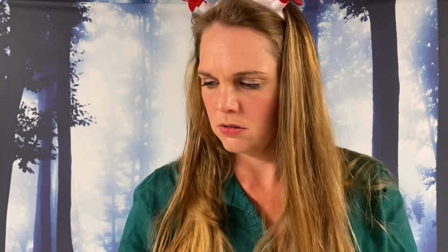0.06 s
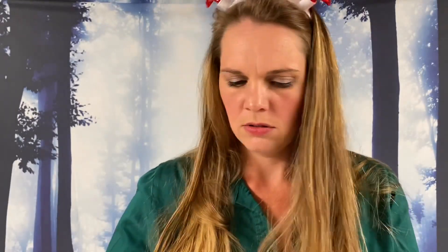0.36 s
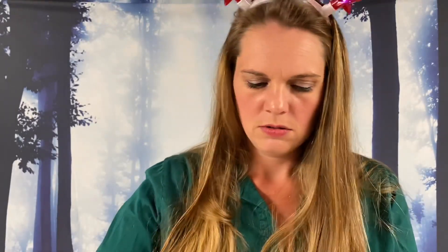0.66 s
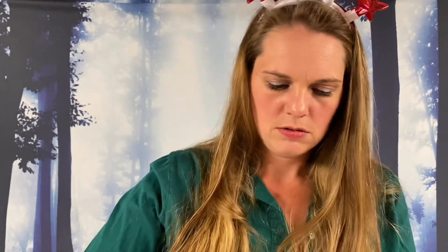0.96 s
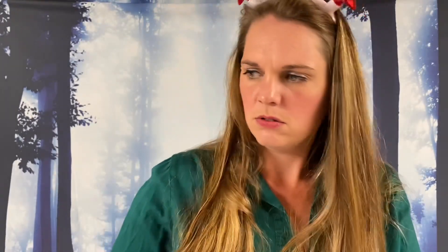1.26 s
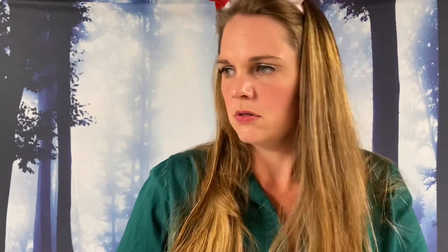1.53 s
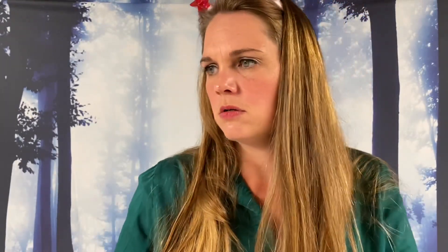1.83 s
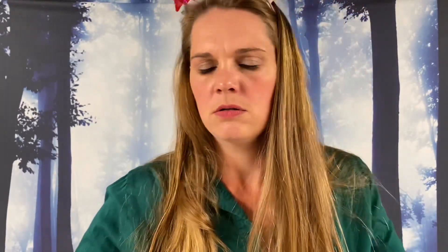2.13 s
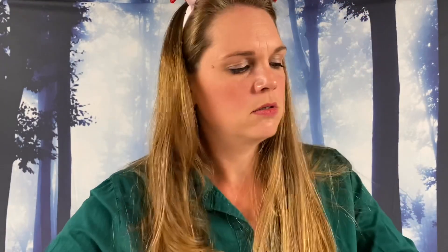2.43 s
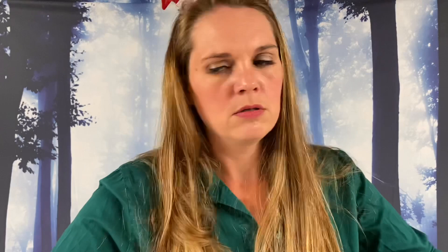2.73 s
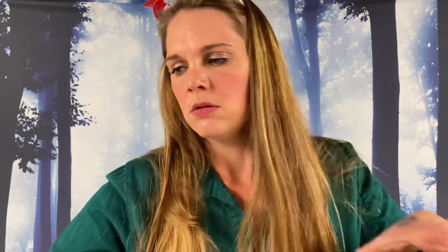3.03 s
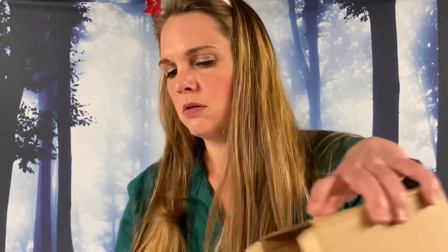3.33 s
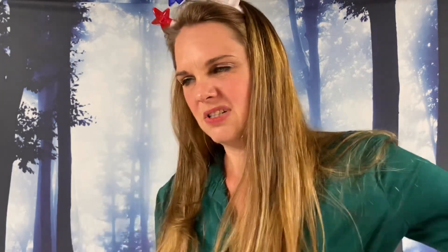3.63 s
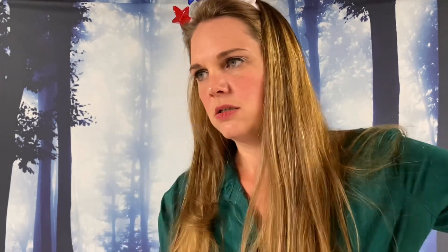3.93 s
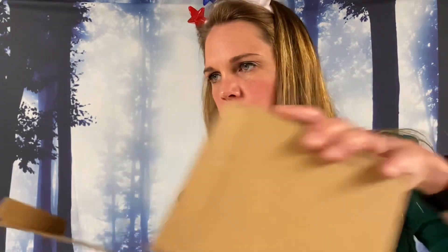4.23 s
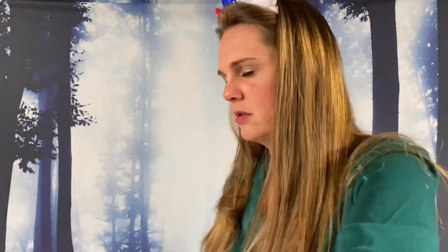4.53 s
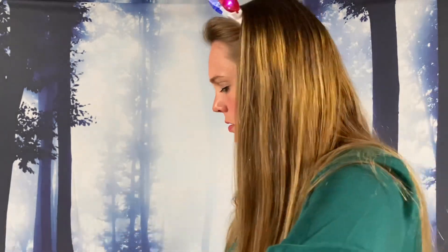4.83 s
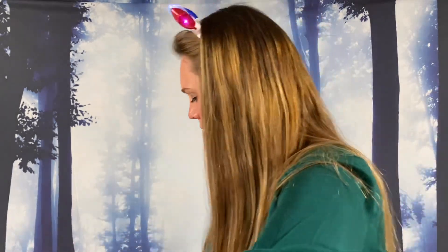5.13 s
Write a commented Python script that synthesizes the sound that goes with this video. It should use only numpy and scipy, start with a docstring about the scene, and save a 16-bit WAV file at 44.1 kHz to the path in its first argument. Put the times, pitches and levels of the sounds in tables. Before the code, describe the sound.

Close rustling and clicking of packaging indoors, then a cardboard box is moved with several dull thumps and knocks.

```python
"""Paper and card rub in strokes as someone rummages in packaging indoors, close to a clip-on microphone.
Stick-slip friction makes the rasp of packaging and clothing; creases buckle in snaps and crackles.
A cardboard box is lifted and swung aside: knocks excite its panel modes and the air inside.
Moving it jolts the microphone with dull thumps, boxy taps and a deep rumble, over a faint motor hum."""
import sys
import numpy as np
from scipy import signal
from scipy.fft import rfft, irfft, next_fast_len
from scipy.io import wavfile
from scipy.ndimage import uniform_filter1d

SR = 44100
rng = np.random.default_rng(int(sys.argv[2]) if len(sys.argv) > 2 else 0)


def transcribe(signal):
    """Save signal, clipped to [-1, 1], as a 16-bit WAV file at the path in sys.argv[1]."""
    frames = np.atleast_2d(signal).T
    limited = np.clip(frames, -1, 1)
    pcm = np.round(limited * 32767).astype(np.int16)
    wavfile.write(sys.argv[1], SR, pcm)


N = 232473
TIME = np.arange(N) / SR

# spectrum of rubbed card and paper: (frequency [Hz], gain [dB])
RASP_SPECTRUM = [(110, -2.5), (250, 4.5), (480, 3), (700, -2.5), (1200, -4.5), (2000, -8), (2700, -10),
                 (3500, -13), (4800, -10), (6500, -9.5), (8800, -17), (11000, -15), (16000, -21.5)]
# spectrum of a crisp tick: (frequency [Hz], gain [dB])
TICK_SPECTRUM = [(1500, 5.5), (2500, -2.5), (5500, 1.5), (9000, -8), (16000, -14.5)]


def undb(db):
    """Amplitude ratio of a level in decibels."""
    return 10 ** (np.asarray(db) / 20)


def unit(x):
    """Normalisation to an rms of 1."""
    return x / np.sqrt(np.mean(x ** 2))


def unit_peak(x):
    """Normalisation to a peak of 1."""
    return x / abs(x).max()


def curves(rows):
    """Linear interpolation of a table's columns over the times in its first column."""
    times, *columns = np.transpose(rows)
    order = np.argsort(times)
    return [np.interp(TIME, times[order], column[order]) for column in columns]


def colour(x, points):
    """Minimum-phase filter through (frequency [Hz], gain [dB]) points, rolling off beyond both ends."""
    hz, db = np.transpose(points)
    size = 2 * next_fast_len(len(x) // 2 + 1)
    f = np.maximum(np.fft.rfftfreq(size, 1 / SR), hz[0] / 10)
    rolloff = (np.minimum(f / hz[0], 1) * np.minimum(hz[-1] / f, 1)) ** 2
    gain = rolloff * undb(np.interp(np.log(f), np.log(hz), db))
    cepstrum = irfft(np.log(gain))[:size // 2]
    cepstrum[1:] *= 2
    return irfft(rfft(x, size) * np.exp(rfft(cepstrum, size)))[:len(x)]


def wander(per_s):
    """Random modulation of rms 1, gliding between per_s values a second."""
    hold = max(int(SR / per_s), 1)
    steps = np.repeat(rng.standard_normal(N // hold + 1), hold)
    return unit(uniform_filter1d(steps, hold)[:N])


def fade(t, t60):
    """Exponential decay by 60 dB in t60 seconds."""
    return np.exp(-np.log(1000) * t / t60)


def add(out, start, sound):
    """Superposition of a sound onto out from a start time in seconds."""
    i = int(np.clip(start * SR, 0, N - 1))
    out[i:i + len(sound)] += sound[:N - i]


def resonance(x, hz, q):
    """A damped resonator of quality factor q whose natural frequency varies in time."""
    phasor = np.exp(2j * np.pi * np.cumsum(hz) / SR)
    pole = np.exp(-np.pi * np.mean(hz) / q / SR)
    return np.real(phasor * signal.lfilter([1 - pole], [1, -pole], x / phasor))


def background(air_db=-45.5, hum_hz=58.7, hum_db=-44.5):
    """The noise floor: broadband noise of still air and a motor's tone of wavering amplitude."""
    # still room: (frequency [Hz], gain [dB])
    air_spectrum = [(20, -7), (38, -1.5), (75, -47), (200, -24), (1500, -52), (6000, -56), (16000, -65)]
    air = undb(air_db) * unit(colour(rng.standard_normal(N), air_spectrum))
    hum = undb(hum_db + 2.7 * wander(3.2)) * unit(np.sin(2 * np.pi * hum_hz * TIME))
    return air + hum


def room(sound, t60=0.051, wet_db=-15):
    """Reverberation: a small furnished room adds faint, quickly absorbed reflections."""
    t = TIME[:SR // 2]
    response = rng.standard_normal(len(t)) * fade(t, t60) * (t > .004)
    reflections = signal.fftconvolve(sound, response / np.linalg.norm(response))[:N]
    return sound + undb(wet_db) * reflections


def sway():
    """Slow motion of body and clothes moves the microphone: a rumble, largely infrasonic."""
    # strength of the sway: (time [s], level [dB])
    sway_levels = [(0, -23.5), (.6, -31.5), (1.0, -22.5), (1.8, -26.5), (2.9, -27), (3.35, -12.5),
                   (4.5, -19), (5.1, -13.5)]
    # its spectrum: (frequency [Hz], gain [dB])
    sway_spectrum = [(2, -7), (5, 5), (8, 2), (20, -12), (60, -23), (120, -29), (300, -54)]
    level_db, = curves(sway_levels)
    return undb(level_db) * unit(colour(rng.standard_normal(N), sway_spectrum))


def thumps(rise_cycles=0.4):
    """Heavily damped oscillation: a soft jolt swings the microphone for a cycle or two."""
    # (time [s], envelope peak [dB], frequency [Hz])
    jolts = [(0.6745, -12, 155), (0.759, -21.5, 138), (1.092, -23, 69), (1.362, -23, 190),
             (2.505, -22.5, 86), (3.309, -14, 103), (3.662, -4, 43), (3.709, -10, 25.8), (3.876, -9, 22),
             (3.946, -9.5, 32.5), (4.082, -8, 61.3), (4.116, -4, 31.4), (4.179, -1.5, 20.5),
             (4.465, -12.5, 59), (4.658, -12.5, 36), (4.937, -18, 135), (5.03, -3, 26.6), (5.109, -5, 26.4),
             (5.179, -10.5, 127), (5.216, -12.5, 38.8)]
    out, t = np.zeros(N), TIME[:SR // 3]
    for start, db, hz in jolts:
        rise = rise_cycles / hz
        envelope = t / rise * np.exp(1 - t / rise)
        add(out, start, undb(db) * envelope * np.sin(2 * np.pi * hz * t))
    return out


def panel_ring(x, t60=0.04, ring_db=-15):
    """Modal overlap: the dense modes of a card panel add a short, noise-like ring."""
    t = TIME[:SR // 10]
    response = rng.standard_normal(len(t)) * fade(t, t60)
    return x + undb(ring_db) * signal.fftconvolve(x, response / np.linalg.norm(response))[:len(x)]


def taps(fastest_hz=5960, slowest_hz=327, edge_s=0.01034, edge_db=-11.5, edge_hz=320):
    """Dispersion: bending-wave speed grows as the root of frequency, so the tick precedes the thud."""
    # taps reaching the microphone: (time [s], peak [dB], low-pass corner [Hz], lag of the thud [s])
    impacts = [(0.201, -29.5, 400, 0.0053), (0.671, -15.5, 400, 0.0051), (2.503, -19, 296, 0.0051),
               (3.657, -22.5, 280, 0.0057), (3.815, -24.5, 716, 0.0021), (3.931, -19, 200, 0.0053),
               (4.101, -18, 1510, 0.002), (4.158, -7, 4500, 0.0072), (4.46, -12, 900, .006),
               (4.658, -25, 100, 0.0039), (5.173, -24, 110, 0.0064)]
    # a tap on clothing and microphone: (frequency [Hz], gain [dB])
    tap_spectrum = [(70, -9), (115, 9), (225, 5.5), (280, 5.5), (390, 3), (560, -7.5), (780, -4),
                    (1000, -11), (1250, -2.5), (1550, -15), (2700, -12), (3500, -30), (4700, -17),
                    (6500, -34), (11000, -70)]
    out, size = np.zeros(N), SR // 5
    f = np.maximum(np.fft.rfftfreq(size, 1 / SR), 1)
    lag_share = np.interp(f ** -.5, [fastest_hz ** -.5, slowest_hz ** -.5], [0, 1])
    pulse = colour(signal.unit_impulse(size), tap_spectrum)
    # the card's edge reflects the wave, weaker and duller
    reflection = np.interp(TIME[:size] - edge_s, TIME[:size], pulse, left=0)
    pulse = pulse + undb(edge_db) * signal.lfilter(*signal.butter(2, edge_hz, fs=SR), reflection)
    for start, db, corner_hz, lag in impacts:
        phase = 2 * np.pi * np.cumsum(lag * lag_share) * SR / size
        dispersed = irfft(rfft(pulse) * np.exp(-1j * phase), size)[:size // 2]
        softened = signal.lfilter(*signal.butter(1, corner_hz, fs=SR), dispersed)
        add(out, start, undb(db) * unit_peak(panel_ring(softened)))
    return out


def crinkles(level_db, per_s=12, spread_db=4, t60=0.011):
    """Small-scale buckling: tiny creases tick at random, following the level of the rubbing."""
    impulses, t = np.zeros(N), TIME[:SR // 50]
    for place, strength in rng.random((int(per_s * N / SR), 2)):
        db = level_db[int(place * N)] + spread_db * (2 * strength - 1)
        add(impulses, place * N / SR, undb([db]))
    tick = colour(rng.standard_normal(len(t)) * fade(t, t60), TICK_SPECTRUM)
    return signal.fftconvolve(impulses, unit_peak(tick))[:N]


def crackles(ticks_per_s=1000, decay_cycles=10, spread_octaves=0.4, scatter_db=14):
    """A buckling cascade: a crease runs through paper as a volley of tiny damped oscillations."""
    # (time [s], duration [s], level [dB], centre frequency [Hz])
    running_creases = [(0.682, 0.019, -34, 10000), (0.685, 0.035, -36, 5100), (1.339, 0.031, -30.5, 2670),
                       (1.362, 0.022, -33.5, 11300), (1.417, 0.078, -33, 2420), (1.546, 0.025, -28.5, 5970),
                       (1.541, 0.13, -32.5, 2020), (1.662, 0.022, -28, 8500), (1.691, 0.097, -36, 2080),
                       (1.72, 0.042, -39, 11500), (3.4317, 0.0029, -38, 12000), (3.912, 0.018, -48, 5150)]
    out, t = np.zeros(N), TIME[:SR // 200]
    for start, length, db, centre_hz in running_creases:
        volley = np.zeros(N)
        for place, pitch, strength in rng.random((int(ticks_per_s * length) + 2, 3)):
            hz = centre_hz * 2 ** (spread_octaves * (2 * pitch - 1))
            tick = np.sin(2 * np.pi * hz * t) * fade(t, decay_cycles / hz)
            add(volley, start + place * length, undb(scatter_db * strength) * tick)
        rms = np.sqrt(np.sum(volley ** 2) / (length * SR))
        out += undb(db) * volley / rms
    return out


def snaps():
    """Snap-through buckling: a crease gives way in one brief crack, part dull and part bright."""
    # (time [s], nominal peak [dB], bright share [dB], t60 [s])
    creases = [(0.684, -16, -7, 0.024), (1.102, -19.5, 0, .027), (1.363, -9.5, -5, 0.03),
               (1.52, -12.5, -4, 0.0086), (1.787, -11, 0, 0.015), (2.187, -22.5, -1.5, 0.022),
               (2.891, -15, -11, 0.032), (3.064, -22, -6.5, 0.013), (4.063, -41, 0, .015),
               (4.135, -24, -17, 0.015), (4.4585, -21, -2, 0.017), (4.5296, -28, -5.5, 0.025),
               (4.848, -19.5, -3, 0.039)]
    out, t = np.zeros(N), TIME[:SR // 20]
    midband = signal.butter(2, [480, 3000], "band", fs=SR)
    for start, db, bright_db, t60 in creases:
        crack = rng.standard_normal(len(t)) * fade(t, t60)
        dull = unit_peak(signal.lfilter(*midband, colour(crack, RASP_SPECTRUM)))
        bright = unit_peak(colour(crack, TICK_SPECTRUM))
        share = undb(min(bright_db, 0))
        add(out, start, undb(db) * (np.sqrt(1 - share ** 2) * dull + share * bright))
    return out


def knocks(cavity_hz=229.5, cavity_t60=0.28, spot_db_per_octave=6, crunch_db=-15.5):
    """Modal vibration: a knock rings the box's panels and the air inside, with a papery crunch."""
    # (time [s], panel peak [dB], cavity level re that peak [dB], frequency the struck spot favours [Hz])
    blows = [(.291, -14.5, -10, 900), (.309, -19, -14, 750), (.330, -18.5, -8, 1100),
             (0.399, -28.5, -2, 600), (0.589, -24, -17, 650), (0.690, -11, -16, 1200),
             (0.745, -17.5, -16, 1100), (2.045, -24, -33, 1080), (2.078, -25.5, -11.5, 900),
             (2.7894, -15.5, -30, 690), (3.296, -24, -4.5, 543), (4.927, -18.5, -12, 900),
             (4.935, -13.5, -14.5, 800), (4.945, -21, -10, 596), (4.973, -12.5, -12.5, 1000),
             (4.987, -8.5, -30, 1300), (4.993, -7.5, -15, 800)]
    # modes of the card panels: (frequency [Hz], relative level [dB], t60 [s])
    panel_modes = [(334, 1.5, 0.053), (529, 0, 0.037), (673, -6.5, 0.067), (859, -8, 0.11),
                   (976, -0.5, 0.029), (1235, -10, 0.034), (1453, -8.5, 0.084), (1630, 1.5, 0.012),
                   (2030, -19, 0.11), (2480, -10, 0.021)]
    out, t = np.zeros(N), TIME[:SR // 2]
    hz, mode_db, t60 = np.transpose(panel_modes)[:, :, None]
    flutter = .35 * wander(90)  # flexing walls make the air ring unevenly
    lowpass = signal.butter(2, 2300, fs=SR)
    for start, db, cavity_db, spot_hz in blows:
        detune, scatter, polarity = rng.standard_normal((3, len(panel_modes), 1))
        weight_db = mode_db + 0.52 * scatter - spot_db_per_octave * abs(np.log2(hz / spot_hz))
        modes = fade(t, t60) * np.sin(2 * np.pi * hz * (1 + 0.016 * detune) * t)
        panels = unit_peak(np.sum(np.sign(polarity) * undb(weight_db) * modes, axis=0))
        rasp = colour(rng.standard_normal(len(t)), RASP_SPECTRUM)
        crunch = unit(signal.lfilter(*lowpass, rasp)) * fade(t, 0.11)
        cavity = np.sin(2 * np.pi * cavity_hz * t) * fade(t, cavity_t60)
        cavity *= 1 + np.interp(start + t, TIME, flutter)
        add(out, start, undb(db) * (panels + undb(crunch_db) * crunch + undb(cavity_db) * cavity))
    return out


def friction(size, slips_per_s=11000, spread_db=0.1, catches_per_s=70, catch_t60=0.12, catch_depth=0.26):
    """Stick-slip: fibres slip in tiny clicks, and the surface catches and lets go in fading bursts."""
    slipping = rng.random(size) < slips_per_s / SR
    slips = slipping * undb(spread_db * rng.exponential(size=size)) * rng.standard_normal(size)
    catches = (rng.random(size) < catches_per_s / SR) * rng.exponential(size=size)
    bursts = signal.lfilter([1], [1, -fade(1 / SR, catch_t60)], catches)
    return unit(slips * (1 + catch_depth * bursts))


def swipes(q=7, grip_share=0.11, flex_octaves=0.039):
    """Forced vibration: a quick stroke drives one panel resonance, which wanders as the card flexes."""
    # (time [s], level [dB], duration [s], resonance [Hz], hiss re that level [dB])
    quick_strokes = [(0.21, -35.5, 0.038, 1150, -7.5), (0.294, -37.5, 0.075, 714, -28),
                     (0.68, -24, 0.025, 1145, -7), (0.715, -29, 0.1, 1150, -3),
                     (0.817, -28, 0.042, 1510, -0.5), (1.027, -32.5, 0.043, 1910, 5),
                     (1.295, -28, 0.024, 230, -22), (1.402, -26.5, 0.019, 870, -16),
                     (1.657, -25, 0.028, 2020, 2), (2.138, -33.5, 0.015, 600, -7),
                     (2.184, -29.5, 0.023, 1000, -3), (2.229, -25.5, 0.016, 1150, -12),
                     (2.763, -26.5, 0.076, 690, -10.5), (3.109, -33.5, 0.13, 890, -31),
                     (3.681, -43, 0.062, 1060, -33), (4.394, -32, 0.05, 1050, -13),
                     (4.495, -31.5, 0.02, 1430, -14), (4.617, -32.5, 0.019, 1640, -17),
                     (4.675, -37.5, 0.0075, 4500, -16.5), (4.925, -26, 0.04, 720, -5),
                     (4.991, -17.5, 0.021, 745, -24)]
    out, flex = np.zeros(N), wander(34)
    for start, db, length, hz, hiss_db in quick_strokes:
        t = TIME[:int(2 * length * SR)]
        envelope = np.minimum(t / (grip_share * length), 1) * np.exp(-(t / length) ** 3)
        pitch_hz = hz * 2 ** (flex_octaves * np.interp(start + t, TIME, flex))
        panel = resonance(colour(friction(len(t)), RASP_SPECTRUM), pitch_hz, q)
        hiss = colour(friction(len(t)), TICK_SPECTRUM)
        add(out, start, undb(db) * envelope * (unit(panel) + undb(hiss_db) * unit(hiss)))
    return out


def contact(attack_s=0.0073, release_s=0.013, easy_stroke_db=-48):
    """Incoherent sources add in power: strokes and clothing set the rubbing's level, bass and treble."""
    # a hand sliding over packaging: (time [s], duration [s], relative level [dB], treble re level [dB])
    strokes = [(0.0, 0.12, -46.5, 3), (0.197, 0.057, -41.5, -3), (0.668, 0.2, -28.5, -1),
               (0.961, 0.081, -37, -0.5), (1.02, 0.094, -35, -3), (1.128, 0.062, -39, -1.5),
               (1.267, 0.11, -36.5, -2), (1.393, 0.11, -33.5, -0.5), (1.521, 0.046, -28.5, -2),
               (1.573, 0.12, -32.5, -2.5), (1.704, 0.092, -29, -3), (2.122, 0.13, -36.5, -14),
               (2.188, 0.23, -39, -2), (2.307, 0.057, -33, -6.5), (2.488, 0.05, -36.5, -3),
               (2.568, 0.3, -34, -4.5), (2.79, 0.057, -27, -7.5), (2.855, 0.14, -33.5, -7.5),
               (3.125, 0.13, -36.5, -13), (4.858, 0.054, -33, -1), (4.885, 0.24, -35, -19)]
    # clothing rustling under the strokes: (time [s], relative level [dB], treble re level [dB])
    rustle = [(.17, -53, -4), (.37, -49, 3.5), (.64, -39, -5), (.92, -42.5, -4), (1.25, -46.5, -2.5),
              (1.8, -44.5, -9), (2.03, -49.5, -7.5), (2.4, -42, -5), (3.1, -39.5, -10.5), (3.4, -48, -6),
              (3.82, -49, -6), (4.02, -57.5, -3.5), (4.13, -48, -11), (4.27, -48.5, -4.5),
              (4.56, -43.5, -6), (4.76, -40.5, -5), (5.27, -39, -1.5)]
    cloth_db, cloth_treble_db = curves(rustle)
    power, treble_power = undb(cloth_db) ** 2, undb(cloth_db + cloth_treble_db) ** 2
    for start, length, db, stroke_treble_db in strokes:
        grip = np.clip((TIME - start) / attack_s, 0, 1)
        release = np.exp(-np.clip((TIME - start - length) / release_s, 0, 20))
        stroke_power = (undb(db) * grip * release) ** 2
        power += stroke_power
        treble_power += stroke_power * undb(stroke_treble_db) ** 2
    level_db = 10 * np.log10(power)
    treble_db = 10 * np.log10(treble_power / power)
    # a hard stroke sounds thin; one that loses treble gains bass
    bass_db = -5 - 0.41 * (level_db - easy_stroke_db) - 0.77 * treble_db
    return level_db, bass_db, treble_db


def rubbing(level_db, bass_db, treble_db, flicker_db=3.0, flicker_per_s=32, gain_db=15.0):
    """Friction noise in third-octave bands, each flickering as the flexing sheets' resonances shift."""
    size = next_fast_len(N)
    spectrum = rfft(colour(friction(N), RASP_SPECTRUM), size)
    band_of_bin = 3 * np.log2(np.maximum(np.fft.rfftfreq(size, 1 / SR), 1))
    out = np.zeros(N)
    for band in range(19, 44):  # centres from 80 Hz to 20 kHz
        bass_weight = np.interp(band, 3 * np.log2([380, 900]), [1, 0])
        # a light touch loses the very top first
        treble_weight = np.interp(band, 3 * np.log2([1600, 4800, 14000]), [0, .9, 1.4])
        band_noise = irfft(spectrum * np.maximum(1 - abs(band_of_bin - band), 0), size)[:N]
        flicker = flicker_db / (1 + treble_weight / 2) * wander(flicker_per_s)
        out += band_noise * undb(level_db + bass_weight * bass_db + treble_weight * treble_db + flicker)
    return undb(gain_db) * out


def scene():
    """Airborne sound passes through the room; structure-borne sound reaches the microphone directly."""
    level_db, bass_db, treble_db = contact()
    airborne = rubbing(level_db, bass_db, treble_db) + swipes()
    airborne += snaps() + crackles() + knocks() + crinkles(level_db + treble_db)
    return (room(airborne) + background() + taps() + thumps() + sway())[None]


def record(dry, cutoff_hz=15900):
    """Soft saturation rounds the largest swings; a steep low-pass filter removes the highest treble."""
    rounded = dry / (1 + dry ** 8) ** (1 / 8)
    return signal.sosfilt(signal.ellip(10, .2, 80, cutoff_hz, fs=SR, output="sos"), rounded)


dry = scene()
out = record(dry)
transcribe(out)
```